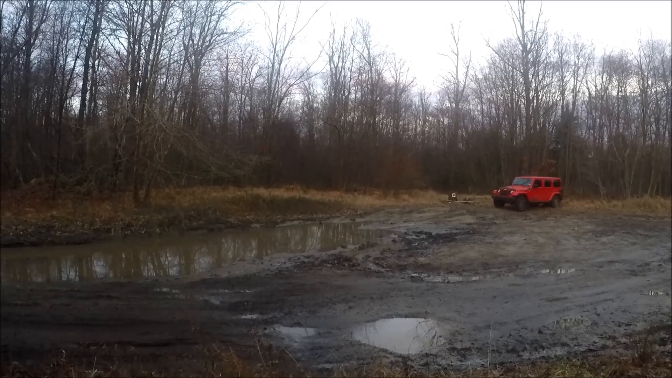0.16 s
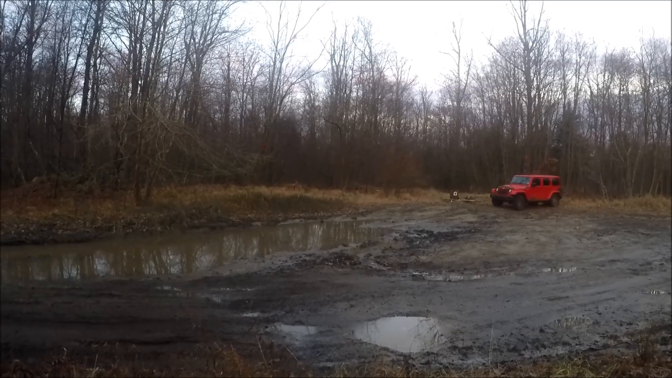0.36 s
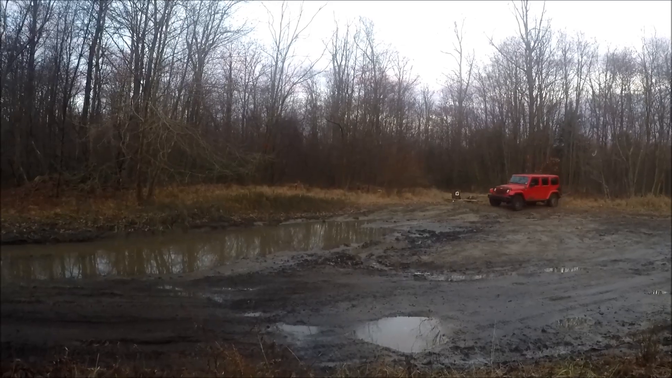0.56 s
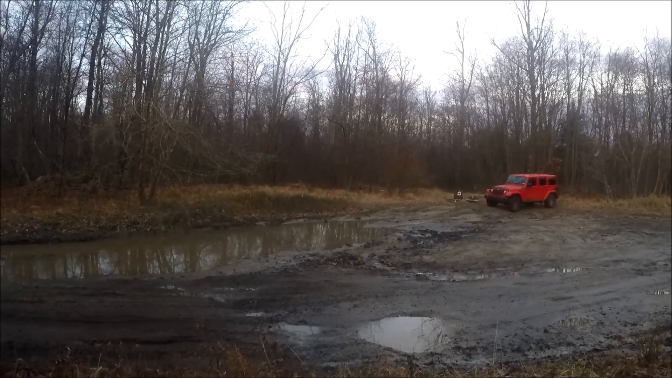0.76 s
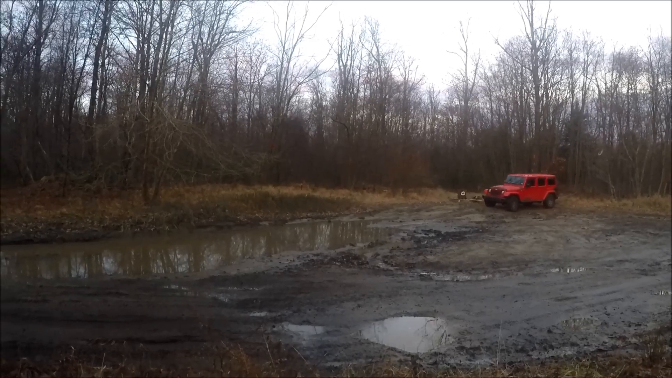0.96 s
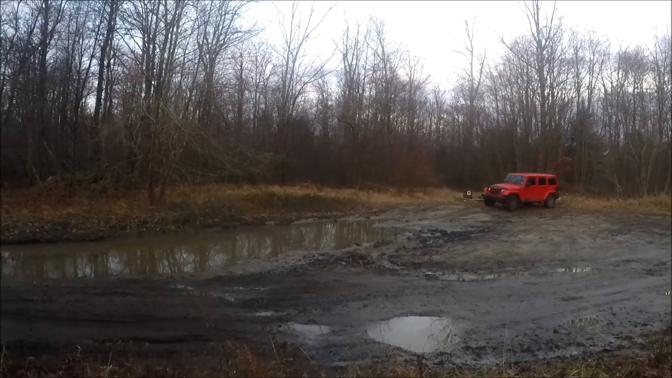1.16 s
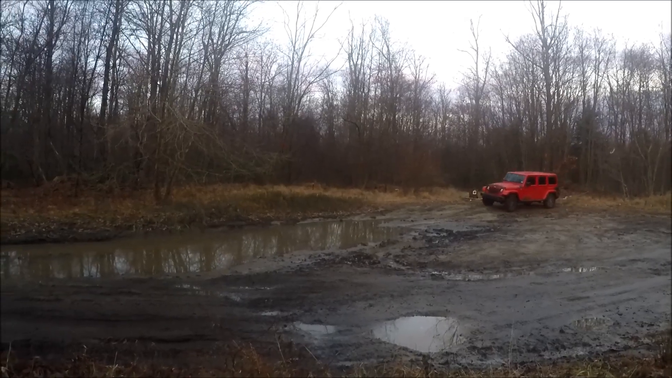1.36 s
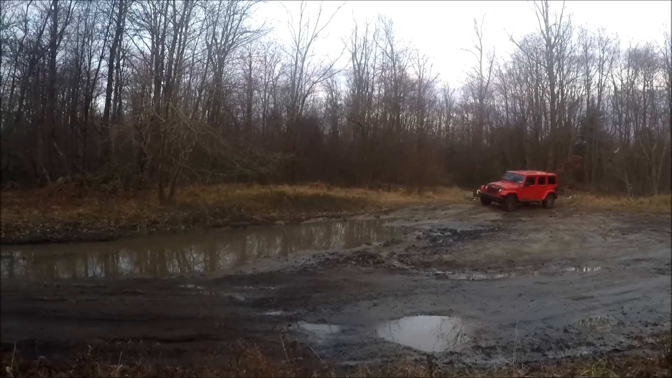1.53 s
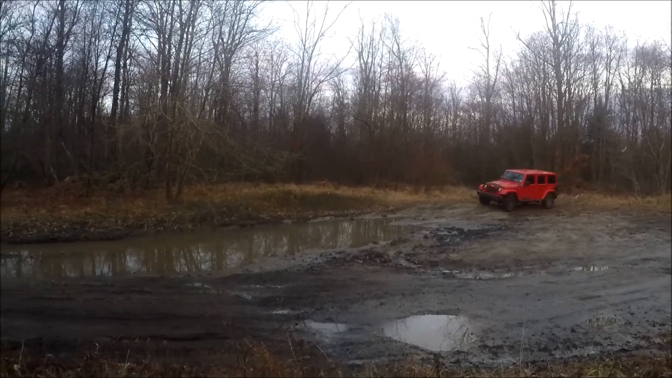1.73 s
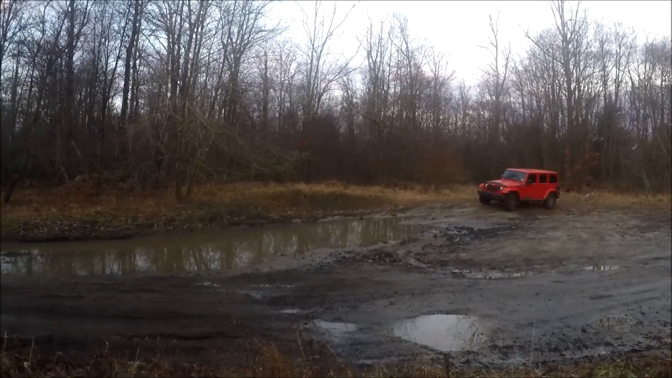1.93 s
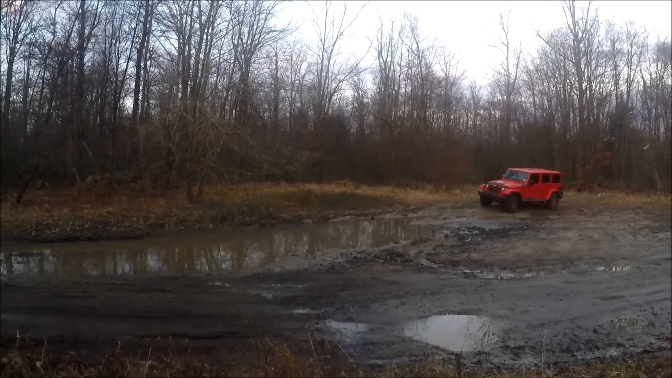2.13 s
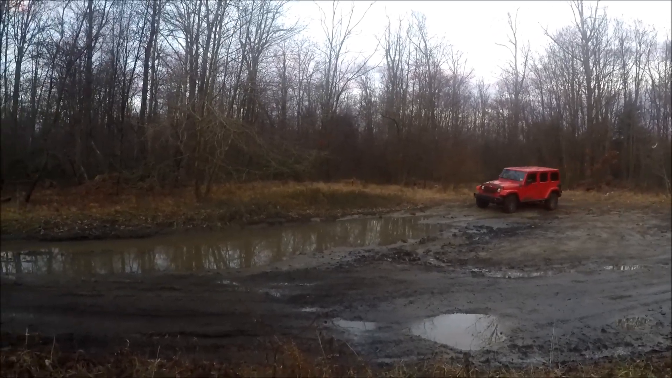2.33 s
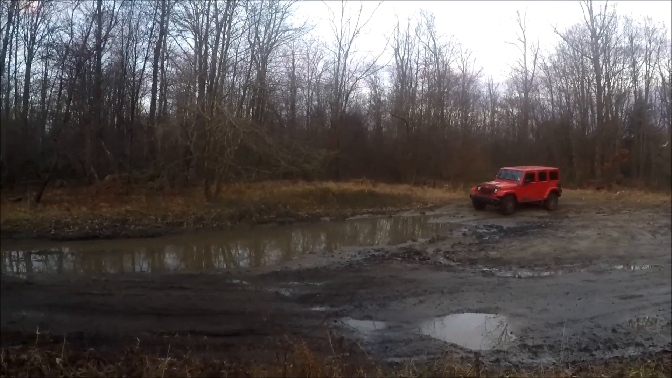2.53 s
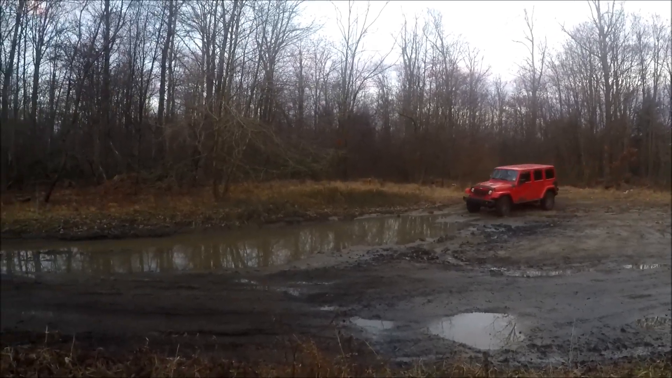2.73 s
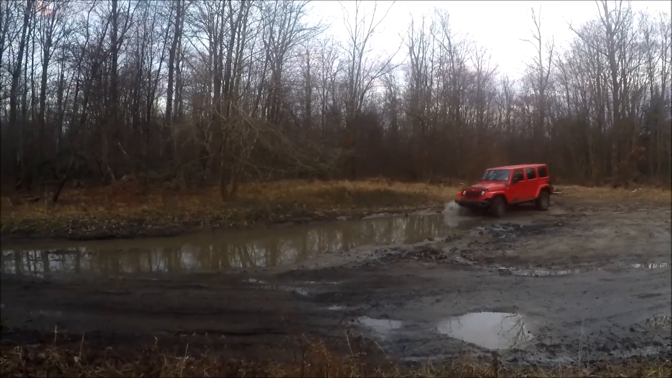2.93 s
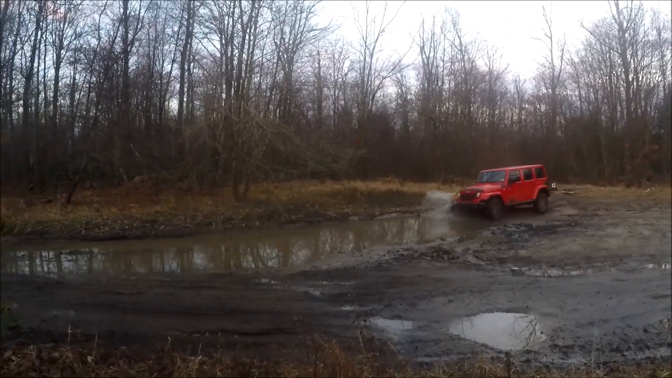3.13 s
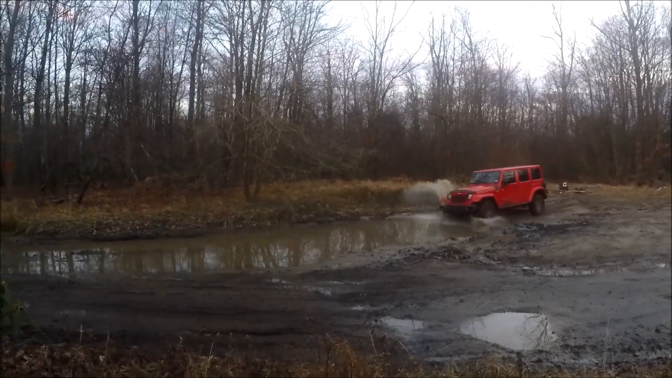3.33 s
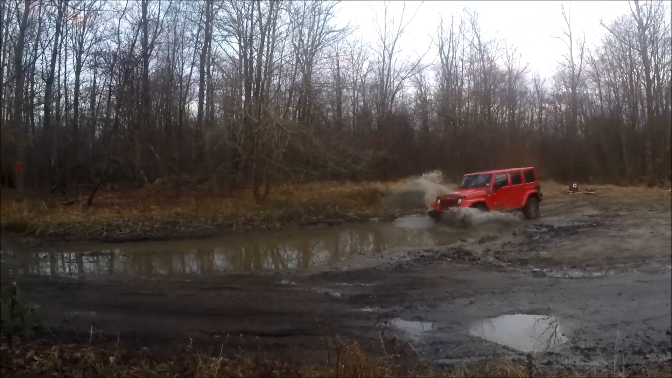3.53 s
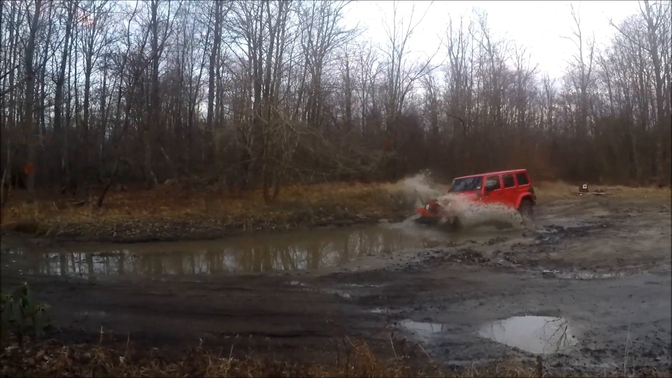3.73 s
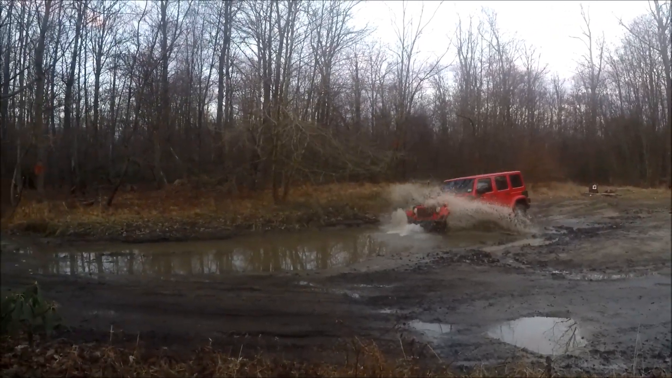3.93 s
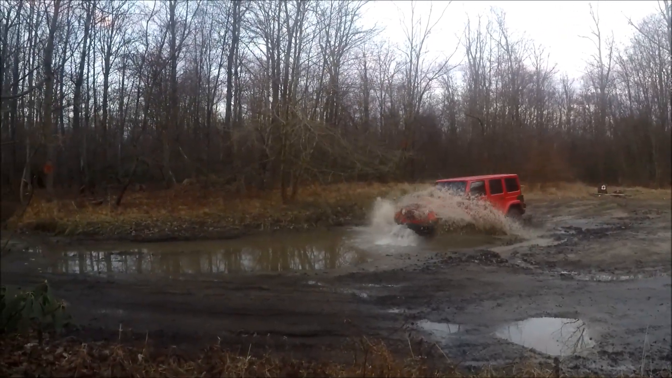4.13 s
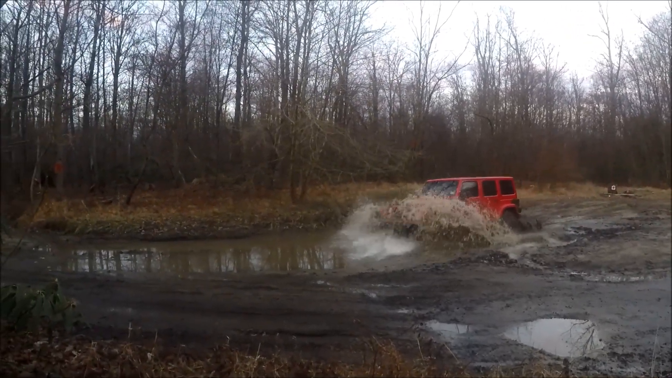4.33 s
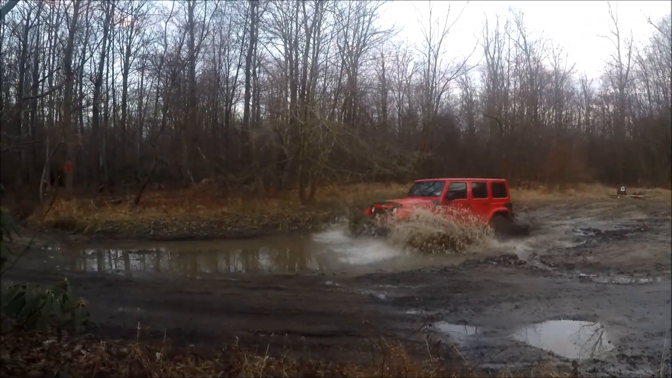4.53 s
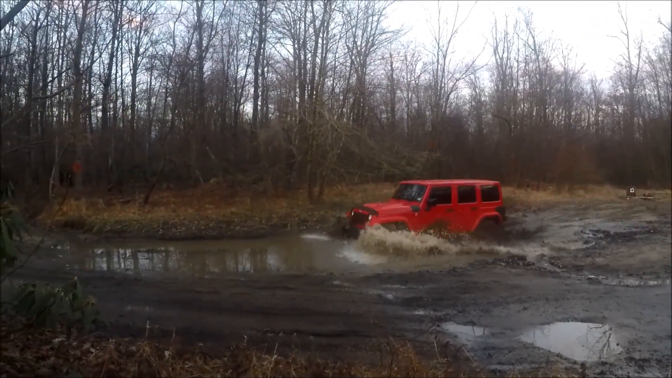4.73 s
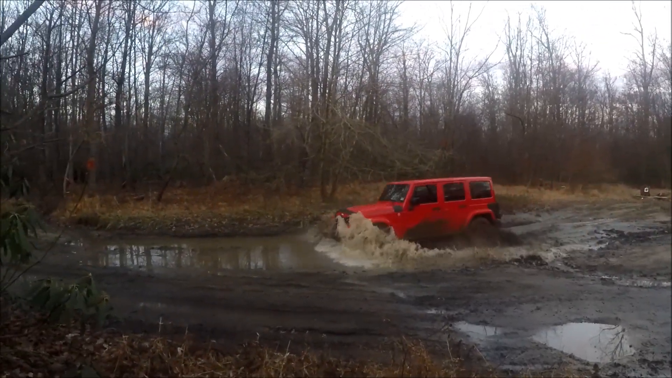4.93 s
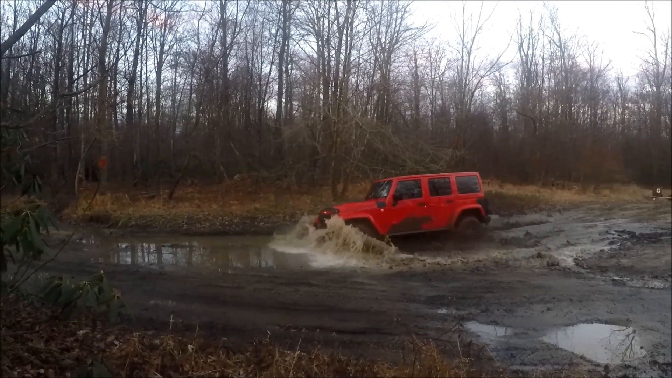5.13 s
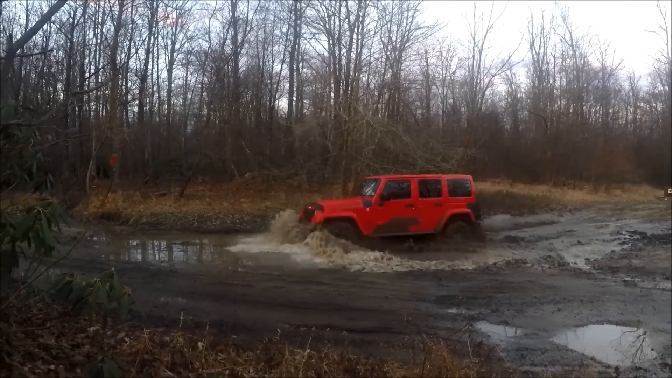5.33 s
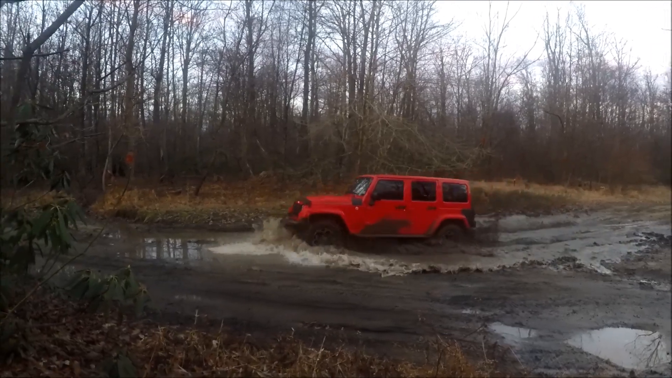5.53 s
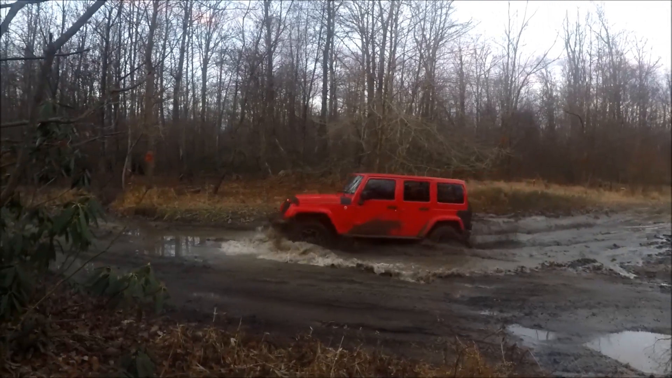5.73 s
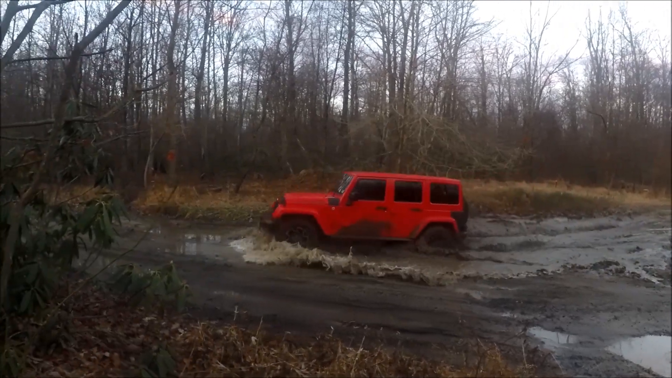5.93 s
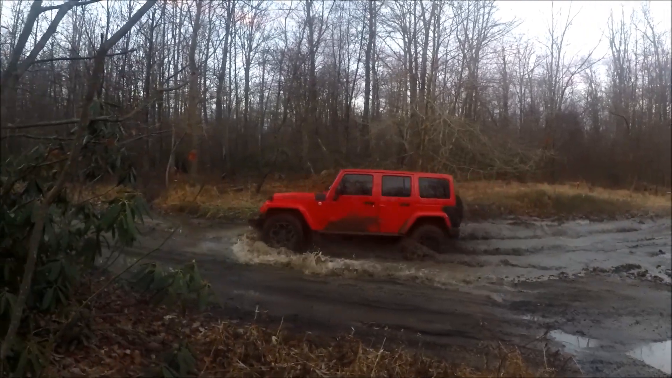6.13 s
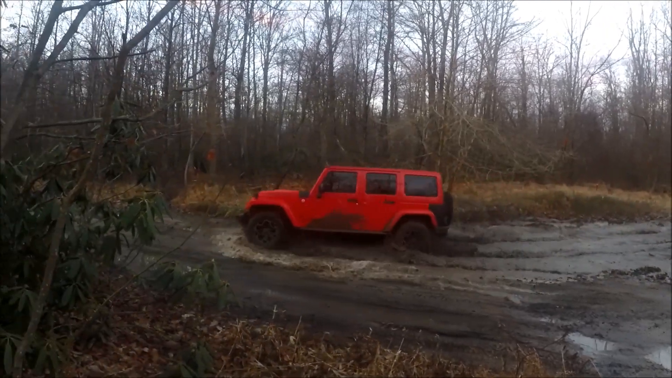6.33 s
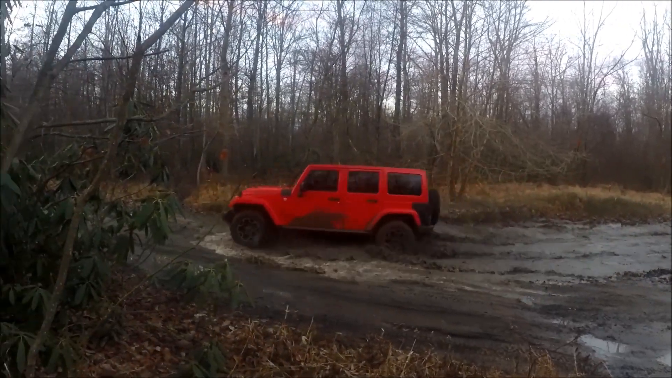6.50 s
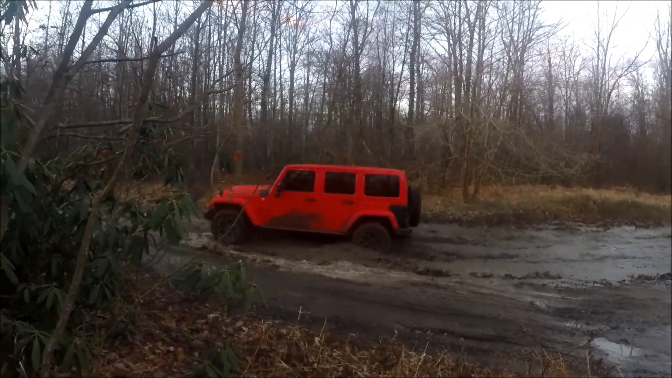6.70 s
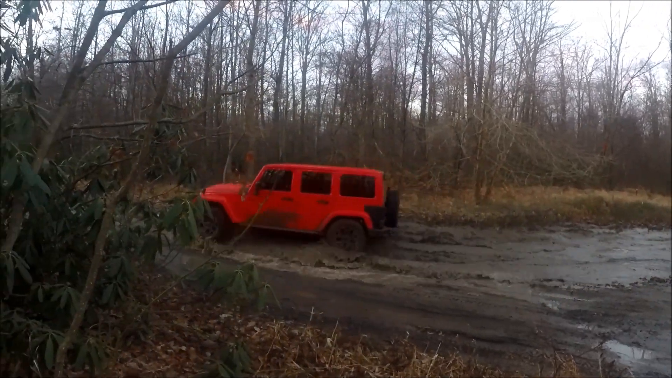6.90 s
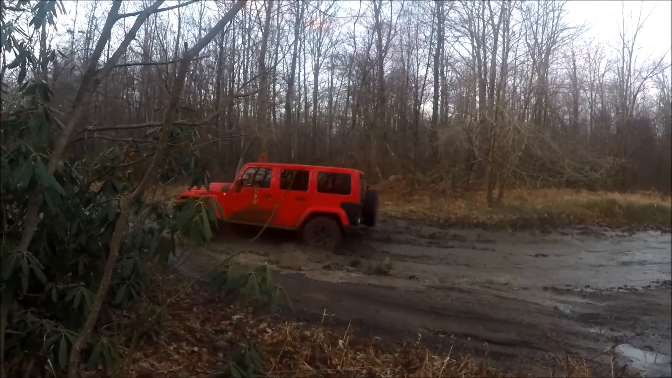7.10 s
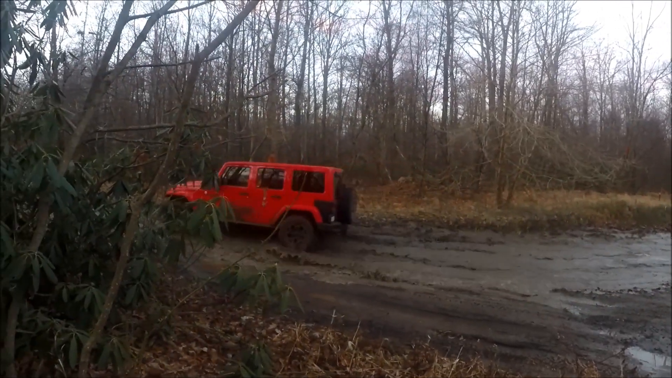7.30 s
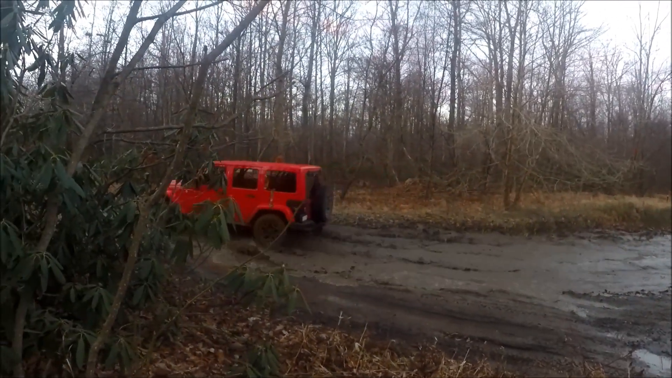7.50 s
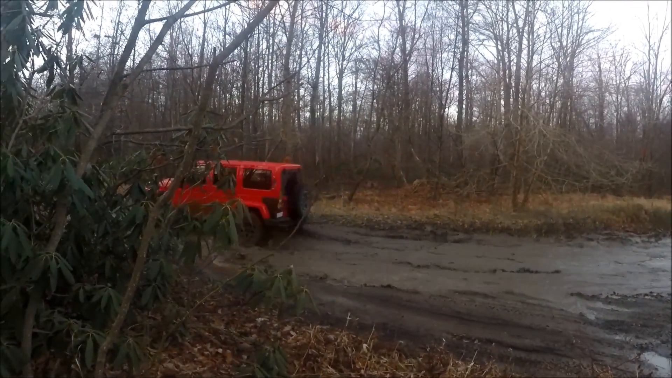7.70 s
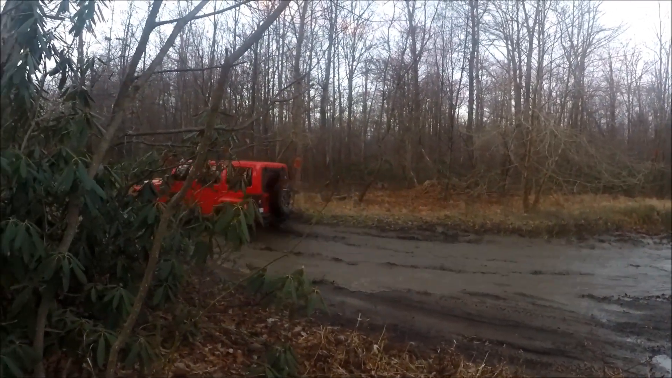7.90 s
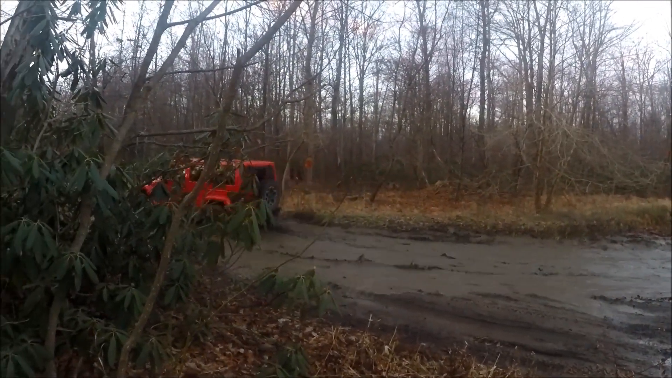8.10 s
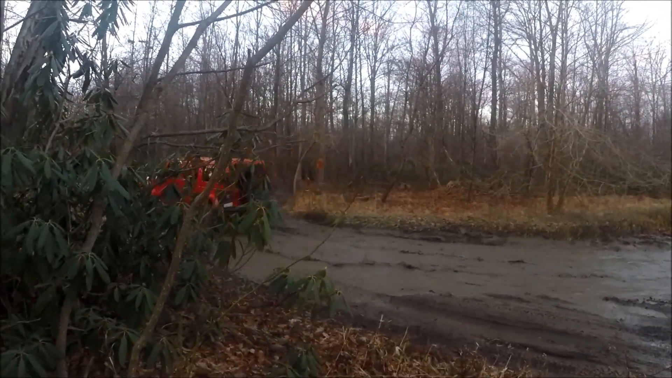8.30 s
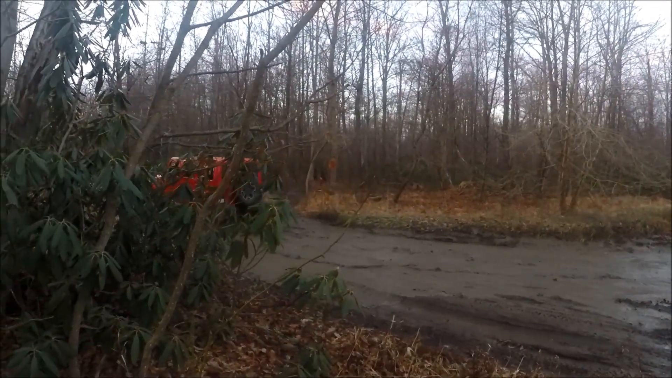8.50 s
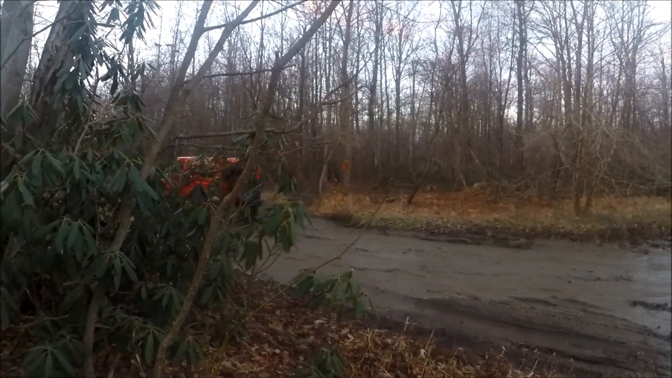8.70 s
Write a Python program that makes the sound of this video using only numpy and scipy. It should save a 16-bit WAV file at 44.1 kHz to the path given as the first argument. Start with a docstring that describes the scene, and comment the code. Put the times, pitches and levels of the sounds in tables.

```python
"""From some 30 m off to the right a four-wheel-drive comes over wet grit: a grain crunch under filtered engine pulses.
Bumps and wind, as decaying sines and low noise, shake the plastic case of the microphones; the woods hiss behind.
From 2 s the wheels throw spray, made of random drops, and knocks ring the modes of the case, the hard ones ducked.
From 3 s the wheels churn bubbles, mud slaps back and jets hiss; it ploughs by under 6 m away, with stronger gusts.
From 7.9 s the wake fades as the wheels climb out and the vehicle draws off to the left."""
import sys
import numpy as np
from scipy import signal
from scipy.fft import rfft, irfft, next_fast_len
from scipy.io import wavfile
from scipy.ndimage import uniform_filter1d, minimum_filter1d, map_coordinates

SR = 44100
rng = np.random.default_rng(int(sys.argv[2]) if len(sys.argv) > 2 else 0)


def store_wav(level_fs):
    """Save 16-bit WAV to argv[1]."""
    pcm = np.round(np.clip(np.atleast_2d(level_fs), -1, 1) * 32767)
    wavfile.write(sys.argv[1], SR, pcm.T.astype(np.int16))


N = 385875
TIME = np.arange(N) / SR
SIZE = next_fast_len(N)
BIN_HZ = np.maximum(np.arange(SIZE // 2 + 1) * SR / SIZE, 1)

# place of the vehicle: time_s, left_over_right_db, left_lag_samples, share_by_way_of_trees [0-1 of power]
PLACE = [(0, -1, 1, 0.4), (2.6, -2, 1, 0.27), (3.6, -1.4, 1, 0.061), (6, -1.5, -0.48, 0.0036),
         (7.4, -0.5, -0.7, 0.022), (8.75, 1.5, -1.2, 0.28)]
WAKE_FULL_S = 3.013   # the wheels are in and the wake has built up


def from_db(db):
    """Decibels to gain."""
    return 10 ** (np.asarray(db) / 20)


def to_db(gain):
    """Gain to decibels."""
    return 20 * np.log10(np.abs(gain) + 1e-9)


def together(*levels_db):
    """Level of unrelated sounds heard at once: their powers add."""
    return 10 * np.log10(sum(from_db(db) ** 2 for db in levels_db))


def rms_one(x):
    """Scale to unit power."""
    return x / np.sqrt(np.mean(x ** 2) + 1e-20)


def in_time(rows):
    """Each column of a curve, at every sample."""
    s, *columns = np.transpose(rows)
    return [np.interp(TIME, s, column) for column in columns]


def in_hz(rows):
    """Each column of a spectrum, at every frequency bin, along a logarithmic pitch axis."""
    hz, *columns = np.transpose(rows)
    return [np.interp(np.log(BIN_HZ), np.log(hz), column) for column in columns]


def since(s):
    """Seconds gone by after a moment, zero before it."""
    return np.maximum(TIME - s, 0)


def until(s):
    """Seconds left before a moment, zero after it."""
    return np.maximum(s - TIME, 0)


def swell(s, rise_s, fall_s):
    """A bell of height 1 that peaks at a moment."""
    return np.exp(-0.5 * ((until(s) / rise_s) ** 2 + (since(s) / fall_s) ** 2))


def drift(rate):
    """Chance wandering of spread 1, in straight strokes, `rate` of them a second."""
    knots = rng.standard_normal(4096)
    return np.interp(TIME * rate, np.arange(len(knots)), knots) * np.sqrt(3 / 2)


def bandpass(x, order, low_hz, high_hz):
    """Keep one band of pitches."""
    return signal.sosfilt(signal.butter(order, [low_hz, high_hz], "band", fs=SR, output="sos"), x)


def ring(clicks, hz, t60):
    """A unit click sets a sine of height 1 ringing; it falls by 60 dB in t60 seconds."""
    decay = from_db(-60 / (t60 * SR))
    turn = 2 * np.pi * hz / SR
    return signal.lfilter([0, np.sin(turn)], [1, -2 * decay * np.cos(turn), decay * decay], clicks + 1e-18)


def click(s, db):
    """One impulse in silence."""
    return from_db(db) * (np.arange(N) == round(s * SR))


def drops(per_s, spread_db):
    """Random impacts, most of them small and a few large."""
    sizes = from_db(spread_db * np.minimum(rng.exponential(1, N), 5)) * rng.choice([-1, 1], N)
    return sizes * (rng.random(N) < per_s / SR)


def bubbles(per_s, low_hz, high_hz, cycles, spread_db, clump_db, count=24):
    """Trapped air rings for some cycles; bubbles of each size come in clumps."""
    births = drops(per_s, spread_db)
    dealt = rng.integers(0, count, N)   # which size each bubble has
    total = 0
    for k, hz in enumerate(np.geomspace(low_hz, high_hz, count)):
        one_size = ring(births * (dealt == k), hz, cycles / hz) * hz
        total = total + one_size * from_db(clump_db * drift(25))
    return rms_one(total)


def port_responses():
    """How direct sound (left, right) and scattered sound (left, right) reach the two microphone ports."""
    # colour that the case gives to each port: pitch_hz, gain_db
    left_colour = [(390, -3), (480, -11), (600, 1), (720, 5.5), (840, 4), (1020, -9.5), (1170, -3),
                   (1300, -5), (1700, -3), (2400, 0.5), (2700, -3), (3050, 4.5), (3350, 0), (3700, 5),
                   (5800, -1.5), (7100, -1.5), (9000, -7.5)]
    right_colour = [(250, -5), (360, -7), (450, -12), (580, -5.5), (740, 5), (870, 7.5), (1170, -1.5),
                    (1500, 2.5), (2100, -7.5), (2350, 2.5), (2600, 0), (3050, 7), (5000, 4.5), (5900, 4.5),
                    (7100, -8), (9000, -6.5)]
    # between the ports: pitch_hz, left_lead_radians, likeness [0-1]
    port_pair = [(100, 0, .99), (370, .25, .97), (470, .6, .62), (640, -1.4, .92), (870, -1.8, .94),
                 (1130, -4, .58), (1380, -5.5, .82), (1950, -5.3, .82), (2150, -6.5, .68),
                 (3700, -6.3, .85), (5300, -6.9, .64), (7500, -5, .25), (10000, -6.3, .25)]
    colour = from_db(in_hz(left_colour) + in_hz(right_colour))
    lead, alike = in_hz(port_pair)
    alike = np.clip(alike, 0, 1)
    direct = colour * np.sqrt(alike) * np.exp(1j * np.outer([0, -1], lead))
    scattered = colour * np.sqrt(1 - alike)
    return direct, scattered


def heard(source, spectrum, ports):
    """A source with its own spectrum at both ports, more diffuse as more comes by the trees; mean has rms 1."""
    direct, scattered = ports
    by_trees = np.clip(in_time(PLACE)[2], 0, 1)
    arriving = np.sqrt(1 - by_trees) * rms_one(source) + np.sqrt(by_trees) * rng.standard_normal((2, N))
    both = direct * rfft(arriving, SIZE) + scattered * rfft(rng.standard_normal((2, N)), SIZE)
    pair = irfft(both * from_db(in_hz(spectrum)[0]), SIZE)[:, :N]
    return pair / np.std(pair.mean(axis=0))


def at_ports(source, ports):
    """A brief sound reaches both ports directly, at its own level."""
    pair = irfft(ports[0] * rfft(source, SIZE), SIZE)[:, :N]
    return pair * np.std(source) / np.std(pair.mean(axis=0))


def passing(pair):
    """As the vehicle moves left, its sound comes to reach the left port sooner and louder."""
    pan_db, lag, _ = in_time(PLACE)
    moved = []
    for x, side in zip(pair, (0.5, -0.5)):   # each port takes half of the difference
        delayed = map_coordinates(x, [np.arange(N) - side * lag], order=3, mode="nearest")
        moved.append(delayed * from_db(side * pan_db))
    return np.array(moved)


def woods(ports):
    """A smooth, faint hiss of the far woods, as steady noise, lies under everything."""
    # relative spectrum: pitch_hz, level_db [per Hz]
    woods_tone = [(500, -10), (1700, 7.5), (3000, -2), (6000, -1.5), (7300, 1.5), (10000, -0.5),
                  (12500, -11), (15000, -18)]
    return heard(rng.standard_normal(N), woods_tone, ports) * from_db(-50.5)


def engine_levels():
    """Rumble, boom and drone in dB: rumble and drone by distance, rumble and boom by depth, boom side-on."""
    # depth of the water at the wheels: time_s, depth [0-1]
    depth_curve = [(2.9, 0), (4.2, 0.62), (4.75, 0.69), (6.8, 0.88), (7.3, 0.85), (7.95, 0.2)]
    # surges of the rumble with throttle and bow wave: peak_s, added_db, half_length_s
    surge_rows = [(2.33, 3, 0.3), (3.74, 2.5, 0.064), (4.4, 2, 0.37), (5.843, 5, 0.064), (6.75, 2, 0.38),
                  (7.399, 1, 0.044)]
    nearest_s, nearest_m, drive_m_per_s = 5.18, 5.57, 5.6
    rumble_nearest_db, drone_nearest_db = -32.5, -38   # rumble on dry ground
    wading_db = 8.5   # what full depth would add to the rumble
    boom_s, boom_peak_db, boom_rise_s, boom_fall_s = 5.75, -27.5, 0.65, 0.79   # flank faces the microphones
    boom_wading_db = -60   # faint boom at full depth

    depth, = in_time(depth_curve)
    distance_m = np.hypot(nearest_m, drive_m_per_s * (TIME - nearest_s))
    nearness_db = to_db(nearest_m / distance_m)
    surges_db = sum(db * swell(s, length, length) for s, db, length in surge_rows)
    rumble_db = rumble_nearest_db + nearness_db + wading_db * depth + surges_db
    side_on_db = boom_peak_db + to_db(swell(boom_s, boom_rise_s, boom_fall_s))
    boom_db = together(side_on_db, boom_wading_db + to_db(depth))
    return rumble_db, boom_db, drone_nearest_db + nearness_db


def engine(ports, uneven_db=9.0, rough=0.44):
    """Six unequal cylinders fire in turn; their pulses mix with the roar of tyres and water under the body."""
    # engine speed before its slight wander: time_s, firings_per_s
    speed = [(0, 104), (1.3, 102), (2.3, 90), (3.2, 99), (4.2, 102), (4.6, 90), (5.5, 98), (5.9, 108),
             (6.2, 113), (6.7, 78.6), (8.75, 74)]
    # relative spectra of rumble, exhaust boom and the drone of the pipe's resonance: pitch_hz, level_db [per Hz]
    rumble_tone = [(70, -62), (105, -50), (122, -23), (142, 0), (190, 1), (275, 0.3), (380, -6), (520, -9),
                   (1200, -48)]
    boom_tone = [(25, -21), (60, 6), (95, 7), (130, 12.5), (170, -3), (400, -16), (800, -67)]
    drone_tone = [(112, -52), (140, -4.5), (174, 1), (205, -3), (260, -16), (600, -47)]
    cylinders_db = uneven_db * np.array([0.99, -1.2, 0.084, 0.52, -1.0, 0.28])

    rumble_db, boom_db, drone_db = engine_levels()
    firing = np.cumsum(in_time(speed)[0] * (1 + 0.005 * drift(12))) / SR
    at = np.flatnonzero(np.diff(np.floor(firing)))
    cylinder = np.arange(len(at)) % 6
    pulses = np.zeros(N)
    pulses[at] = from_db(cylinders_db[cylinder]) * (1 + rough * rng.standard_normal(N)[at])
    pulses = rms_one(pulses)
    # each part adds its own share of roar to the pulses
    rumble = heard(pulses + from_db(12.5) * rng.standard_normal(N), rumble_tone, ports)
    boom = heard(pulses + from_db(0.5) * rng.standard_normal(N), boom_tone, ports)
    drone = heard(pulses + from_db(3.0) * rng.standard_normal(N), drone_tone, ports)
    return (rumble * from_db(rumble_db + 0.5 * drift(28))
            + boom * from_db(boom_db + 1.8 * drift(5.9))
            + drone * from_db(drone_db + 0.68 * drift(4.6)))


def tyres(ports):
    """Wet grit crunches under the treads until water drowns it; now and then a stone snaps and rings."""
    # relative spectrum of the grit: pitch_hz, level_db [per Hz]
    gravel_tone = [(250, -27), (450, 2), (900, 4), (1700, 7), (2400, -2.5), (3200, -5.5), (4500, -14.5),
                   (6100, -2), (7500, -7), (13000, -32)]
    # stones from under the tyres: start_s, level_db, pitch_hz
    stone_rows = [(1.924, -30, 1800), (2.061, -48, 2900), (2.134, -32, 1400), (2.438, -34, 1600),
                  (2.548, -24, 1940)]
    stone_t60_s = 0.037
    base_db, rise_db_per_s = -35.5, 5.5
    drown_s, drown_db_per_s = 2.71, 33
    level_db = base_db - rise_db_per_s * until(WAKE_FULL_S) - drown_db_per_s * since(drown_s)
    crunch = heard(drops(4500, 2.3), gravel_tone, ports)
    stones = sum(ring(click(s, db), hz, stone_t60_s) for s, db, hz in stone_rows)
    return crunch * from_db(level_db + 0.66 * drift(16)) + stones


def wind(lumpy_db=3.0, apart=0.22):
    """Eddies shake the whole case, so both ports get nearly the same low flutter."""
    # relative spectrum of the buffeting: pitch_hz, level_db [per Hz]
    buffet_tone = [(8, 3), (18, 2.5), (40, -1), (65, -4), (110, -14), (300, -30), (1000, -70)]
    # gusts on the case: peak_s, level_db, half_length_s
    gust_rows = [(0.103, -50.5, 0.66), (3.44, -47, 0.18), (3.9, -47, 0.15), (4.683, -32, 0.21),
                 (5.076, -29.5, 0.22), (6.301, -26.5, 0.75), (7.25, -25, 0.28), (8.05, -30.5, 0.55),
                 (8.715, -32, 0.092)]
    breeze_db = -64.5   # between gusts
    noise = rfft(rng.standard_normal((2, N)), SIZE)
    mid, side = irfft(noise * from_db(in_hz(buffet_tone)[0]), SIZE)[:, :N]
    flutter = rms_one(mid) + apart * rms_one(side) * np.array([[1], [-1]])
    gusts_db = [db + to_db(swell(s, length, length)) for s, db, length in gust_rows]
    return flutter * from_db(together(breeze_db, *gusts_db) + lumpy_db * drift(15))


def bumps(t60=0.018, dull_hz=260, lowest_hz=22):
    """Dull bumps: the camera's mount gives one heavily damped swing, alike at both ports."""
    # bumps, before the band filter: start_s, level_db, pitch_hz
    bump_rows = [(0.018, -20, 49.5), (0.255, -21, 51.6), (0.33, -28, 46.6), (0.562, -33, 51.7),
                 (5.044, -5, 52), (6.394, 0, 55), (6.806, -5, 50), (7.088, -10, 42.1), (7.279, -3, 42),
                 (7.359, -8, 45), (8.229, -2, 62.6), (8.528, 2, 48)]
    swing = sum(ring(click(s, db), hz, t60) for s, db, hz in bump_rows)
    return bandpass(swing, 2, lowest_hz, dull_hz)


def thrown_db(rows):
    """Level of thrown water: each throw rises quickly to its peak and falls back slowly."""
    sharpness = 0.79   # how closely a throw gathers round its peak
    levels_db = []
    for s, db, rise in rows:
        age = since(s) / rise
        levels_db.append(db + sharpness * to_db(age * np.exp(1 - age)))
    return together(*levels_db)


def water_levels():
    """Churn, spray and mist in dB: a steady wake, and a sheet that rises and falls back for each splash."""
    # a wheel drops into water and throws a sheet: start_s, spray_db, time_to_peak_s
    splash_rows = [(1.82, -47.5, 0.14), (2.42, -39, 0.8), (2.79, -35, 0.06), (2.84, -26, 0.069),
                   (3.28, -28, 0.086), (4.26, -25.5, 0.66), (6.12, -29, 0.21), (8.3, -40, 0.36)]
    wake_rise_db_per_s, wake_end_s, wake_fade_db_per_s = 45, 7.88, 3.5
    churn_full_db, spray_full_db = -27.5, -27.5   # in the full wake
    spray_follows = 2.3   # spray swings more than churn with the wake
    # mist relative to spray: it gathers up to a moment, then settles
    mist_peak_s, mist_peak_db, gather_db_per_s, settle_db_per_s = 4.42, -6.5, 3.5, 2

    wake_db = -wake_rise_db_per_s * until(WAKE_FULL_S) - wake_fade_db_per_s * since(wake_end_s)
    churn_db = churn_full_db + wake_db
    spray_db = together(spray_full_db + spray_follows * wake_db, thrown_db(splash_rows))
    mist_over_spray_db = (mist_peak_db - gather_db_per_s * until(mist_peak_s)
                          - settle_db_per_s * since(mist_peak_s))
    return churn_db, spray_db, spray_db + mist_over_spray_db


def water(ports):
    """Wheels churn bubbles into the puddle; sheets of spray break up and patter back as drops and mist."""
    # relative spectra of churn, spray and the fine mist that hangs in the air: pitch_hz, level_db [per Hz]
    churn_tone = [(120, -24), (300, 0), (550, -4.5), (1000, -1.5), (1800, 0.5), (2600, -10.5), (4000, -14),
                  (8000, -64)]
    spray_tone = [(600, -16), (1700, 3), (2800, -2.5), (4000, -1.5), (6000, 1.5), (7200, -3), (8500, -20),
                  (11000, -37)]
    mist_tone = [(4000, -18), (6500, 6), (7300, 5), (8500, 1), (10000, -2), (12500, -10.5), (15000, -21)]
    churn_db, spray_db, mist_db = water_levels()
    slosh = drift(14)   # each sheet of water lifts all sizes of drop together
    churn = bubbles(per_s=5000, low_hz=321, high_hz=3000, cycles=12.7, spread_db=0.5, clump_db=0.5, count=36)
    churn = churn + from_db(6) * rms_one(drops(7000, 2.2))
    spray = rms_one(drops(16000, 1.5))
    spray = spray + from_db(-6.0) * bubbles(per_s=7000, low_hz=1725, high_hz=6800, cycles=14.0,
                                            spread_db=2.5, clump_db=0.5)
    mist = drops(10000, 3.7)
    return (heard(churn, churn_tone, ports) * from_db(churn_db + 0.28 * slosh + 0.92 * drift(60))
            + heard(spray, spray_tone, ports) * from_db(spray_db + 0.25 * slosh + 0.31 * drift(45))
            + heard(mist, mist_tone, ports) * from_db(mist_db + 0.15 * slosh + 0.95 * drift(30)))


def tap(s, db, hard_hz):
    """An impulse rounded by the softness of the contact."""
    soft = np.exp(-2 * np.pi * hard_hz / SR)
    return signal.lfilter([1 - soft], [1, -soft], click(s, db) + 1e-18)


def knocks(lowest_hz=125, highest_hz=8000):
    """Taps ring the case: its wall cracks inward as the body swings out; softer contacts dull the high modes."""
    # knocks on the case, before contact and modes shape them: start_s, impulse_db, contact_hardness_hz
    knock_rows = [(2.029, -25, 3000), (2.4808, -19.5, 5100), (2.5319, -0.5, 5500), (2.583, -18, 500),
                  (3.1424, 2, 2400), (3.2026, 3.5, 1390)]
    # modes of the case, heard unequally at the two ports: pitch_hz, left_db, right_db, t60_s
    case_modes = [(167, -28, -1.5, 0.069), (272, -3.5, -26, .05), (324, -24, -2, 0.026),
                  (460, -32, -3.5, 0.019), (590, -20, -34, 0.024), (870, -31, -12, 0.0074),
                  (1090, -18, -24, 0.0051), (1350, -31, -21, 0.0053), (1850, -9, -20, 0.022),
                  (2100, -28, -4.5, 0.0053), (2540, -1.5, -15, 0.0076), (3200, -8, -11, 0.0098),
                  (5300, -26, -13, 0.0035), (6800, -19, -14, 0.0032)]
    crack_above_hz = 1000   # modes above it start inward
    taps = sum(tap(s, db, hard_hz) for s, db, hard_hz in knock_rows)
    pair = 0
    for hz, left_db, right_db, t60 in case_modes:
        direction = np.sign(crack_above_hz - hz)
        pair = pair + direction * ring(taps, hz, t60) * from_db([[left_db], [right_db]])
    # the camera's wind filter thins the lows of the knocks; their top is dulled
    return bandpass(pair, 4, lowest_hz, highest_hz)


def slaps(ports):
    """Gouts of muddy water land as bursts of impacts in a band round a pitch, with a spatter of fine drops."""
    # gouts that slap back into the puddle: start_s, level_db, time_to_peak_s, pitch_hz
    slap_rows = [(2.84, -32.5, 0.057, 1100), (3.42, -29, 0.028, 1610), (3.575, -29, 0.017, 800),
                 (4.0, -30, 0.011, 1400), (5.02, -30, .019, 850), (5.34, -31, 0.022, 814),
                 (5.87, -36, 0.012, 1500), (6.295, -31, 0.018, 1650), (6.73, -32, 0.028, 1600),
                 (7.22, -26.5, .03, 1100), (7.58, -32, 0.035, 800), (7.835, -28, .014, 1070)]
    spread = 1.45   # ratio of the band's upper edge to its middle
    spatter = from_db(-8.5) * rms_one(bandpass(drops(3500, 5.0), 3, 2800, 6000))
    out = 0
    for s, db, rise, hz in slap_rows:
        gulp = rms_one(bandpass(drops(4000, 0.81), 2, hz / spread, hz * spread))
        out = out + (gulp + spatter) * from_db(thrown_db([(s, db, rise)]))
    return at_ports(out, ports)


def jets(ports, width=0.1):
    """A narrow jet hits the panels and hisses briefly around one pitch."""
    # jets of water against the body: peak_s, level_db, half_length_s, pitch_hz
    jet_rows = [(2.934, -39, 0.057, 6800), (3.258, -20, 0.019, 6250), (3.403, -28.5, 0.024, 6040),
                (4.494, -35, 0.13, 5700)]
    out = 0
    for s, db, length, hz in jet_rows:
        hiss = signal.lfilter(*signal.iirpeak(hz, 1 / width, fs=SR), drops(14000, 4.4))
        out = out + rms_one(hiss) * from_db(db) * swell(s, length, length)
    return at_ports(out, ports)


def scene():
    """The vehicle passes from right to left; wind, knocks and bumps act on the camera itself."""
    ports = port_responses()
    vehicle = tyres(ports) + water(ports) + slaps(ports) + jets(ports) + engine(ports)
    return passing(vehicle) + woods(ports) + wind() + knocks() + bumps()


def limiter(x, ceiling_db=-1.0, hold_s=0.023, release_db_per_s=110, attack_s=0.0044):
    """The gain glides down just ahead of a peak over the ceiling, holds briefly, then recovers."""
    over_db = np.maximum(to_db(np.abs(x).max(axis=0)) - ceiling_db, 0)
    half = int(hold_s * SR / 2)
    held_db = -minimum_filter1d(-over_db, 2 * half + 1, origin=half)
    fall_db = release_db_per_s * TIME
    gain_db = fall_db - np.maximum.accumulate(held_db + fall_db)
    ahead = int(attack_s * SR)
    return x * from_db(uniform_filter1d(minimum_filter1d(gain_db, ahead), ahead))


def record(dry):
    """The limiter acts, what still overshoots is rounded, the top is cut."""
    held = limiter(dry)
    rounded = held / (1 + held ** 6) ** (1 / 6)
    cutoff_hz = 14900
    return signal.sosfilt(signal.ellip(14, 0.2, 80, cutoff_hz, fs=SR, output="sos"), rounded)


dry = scene()
out = record(dry)
store_wav(out)
```